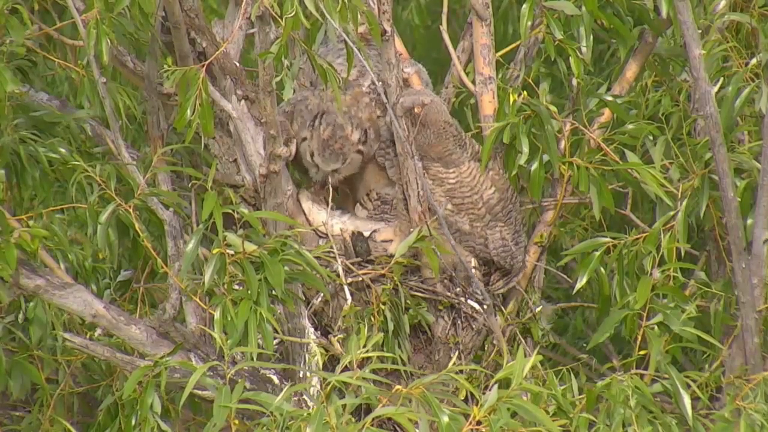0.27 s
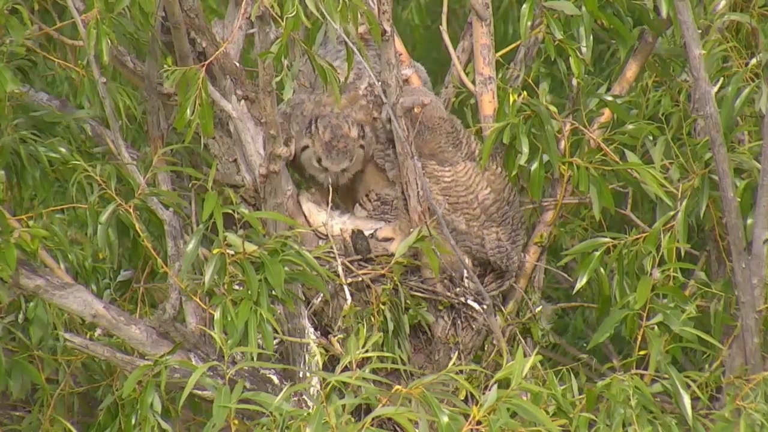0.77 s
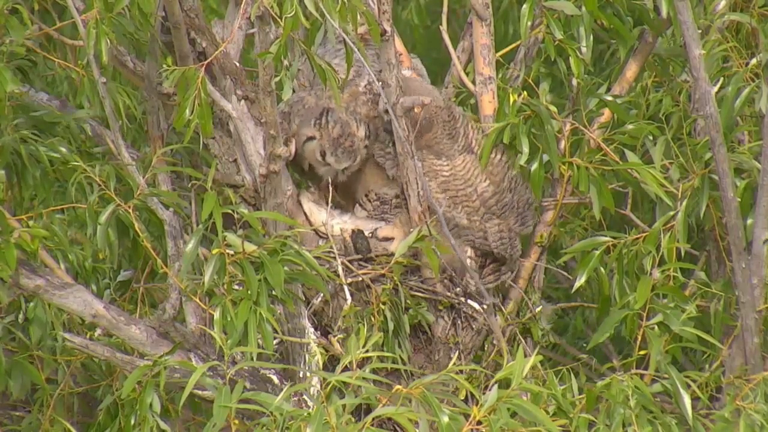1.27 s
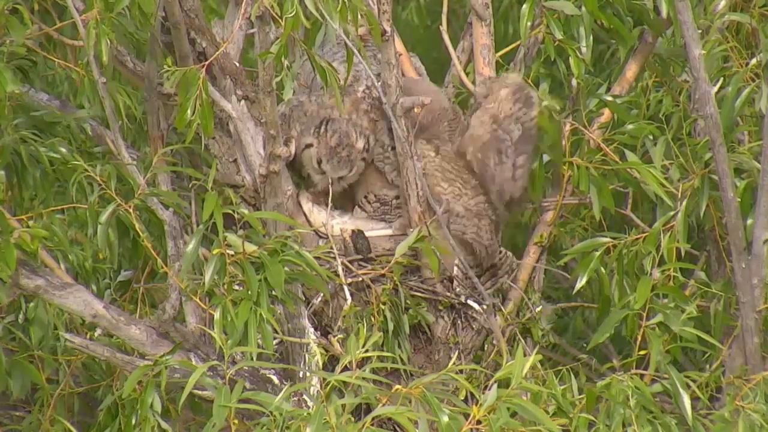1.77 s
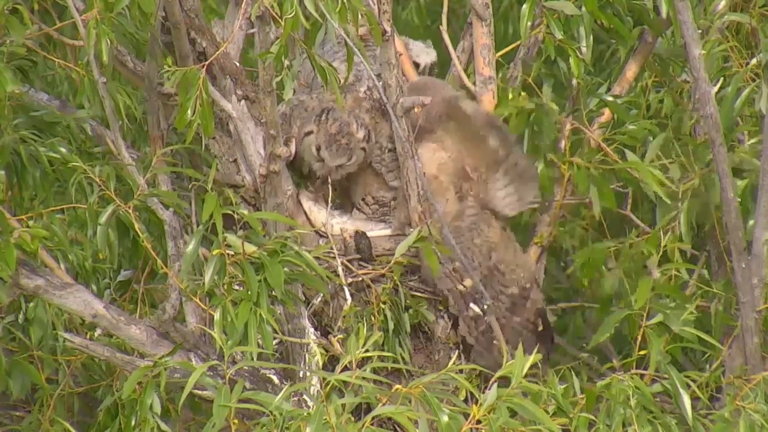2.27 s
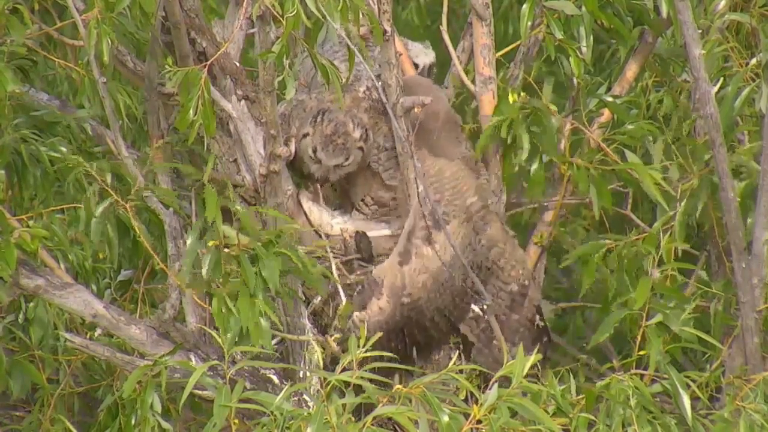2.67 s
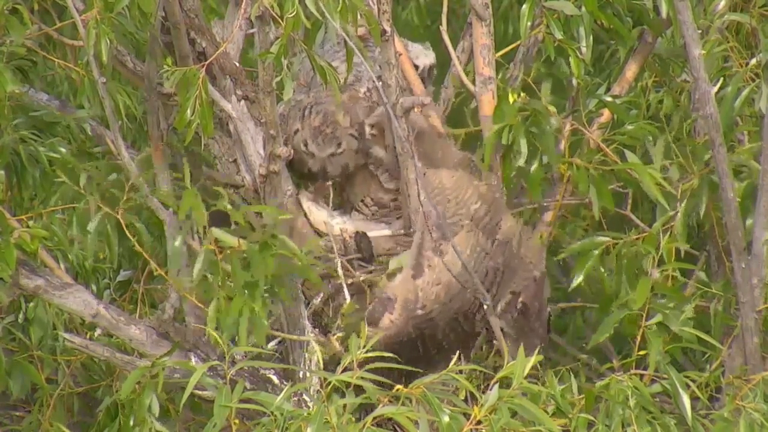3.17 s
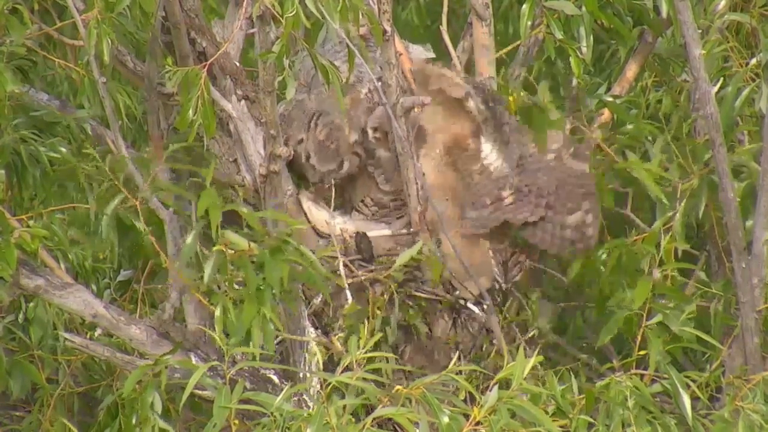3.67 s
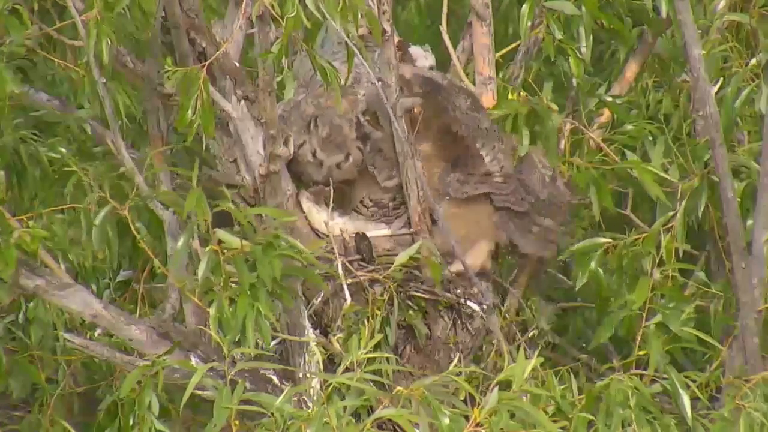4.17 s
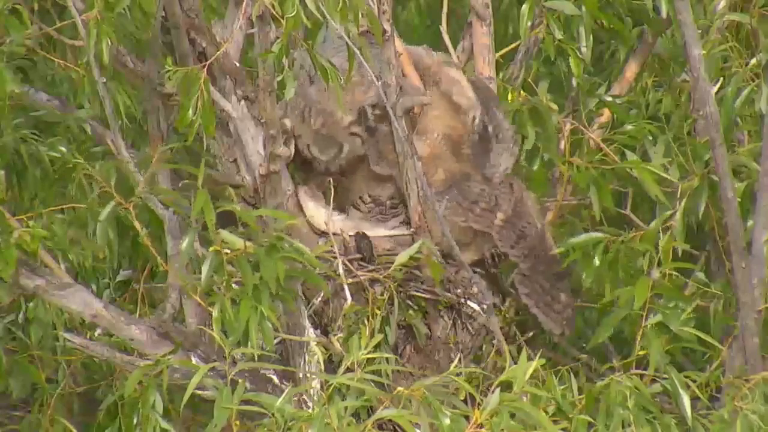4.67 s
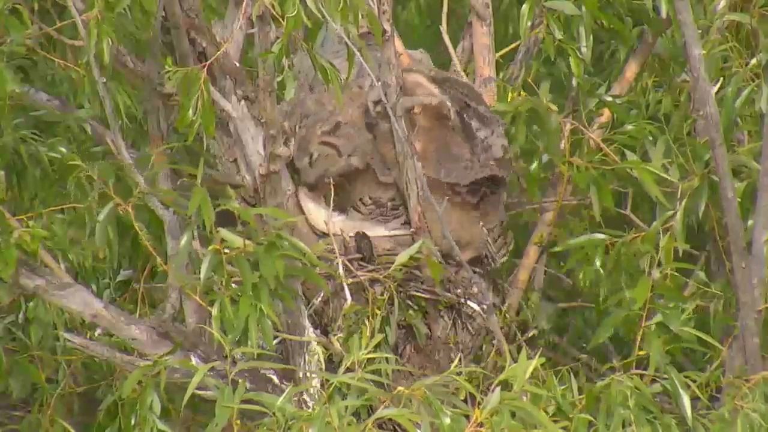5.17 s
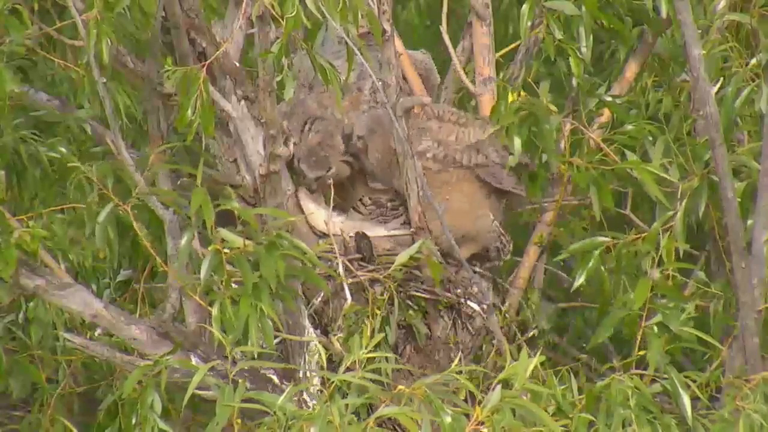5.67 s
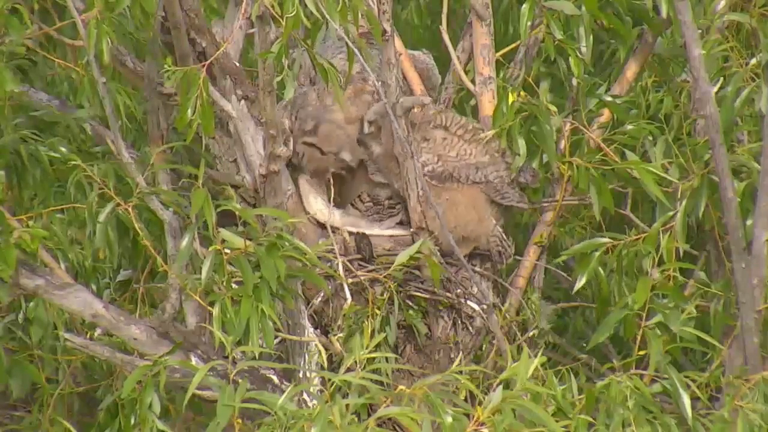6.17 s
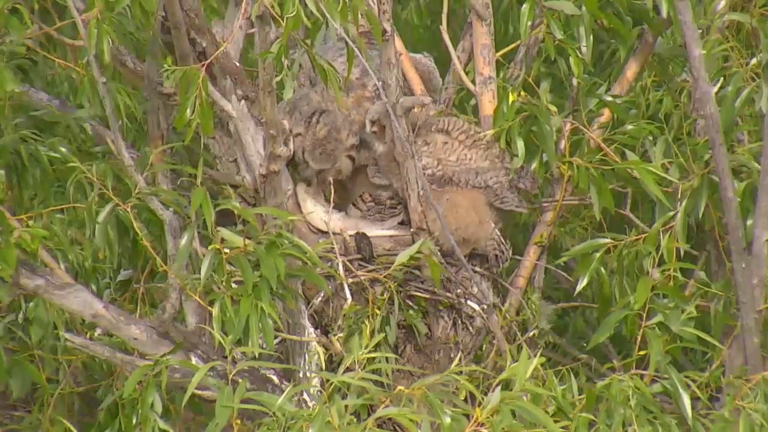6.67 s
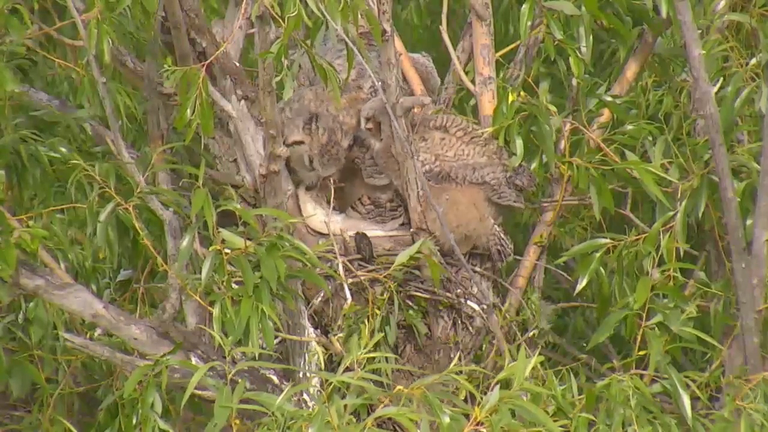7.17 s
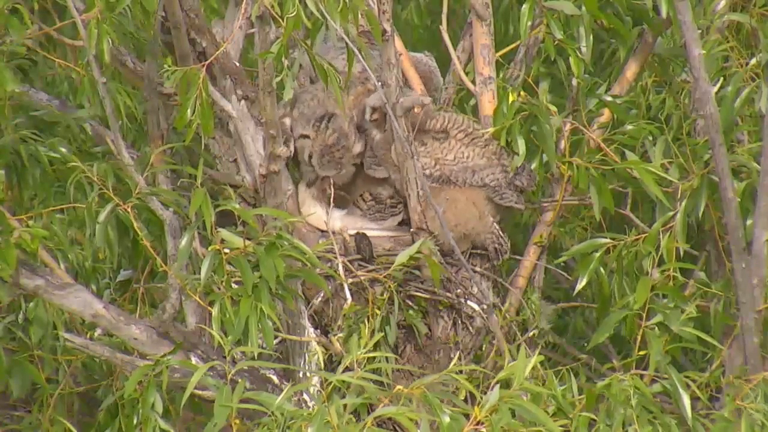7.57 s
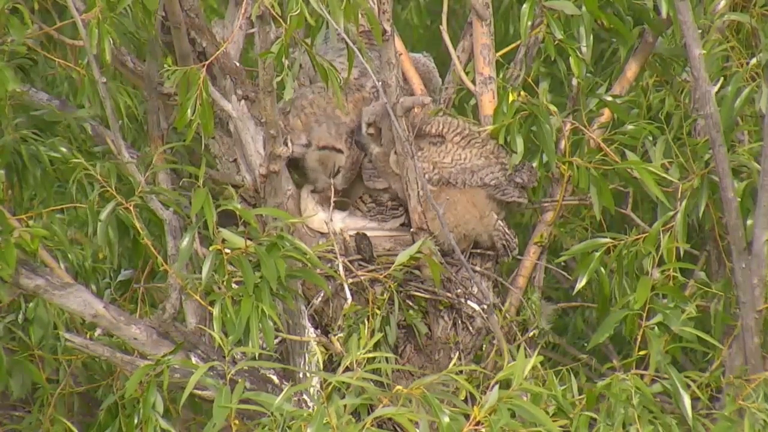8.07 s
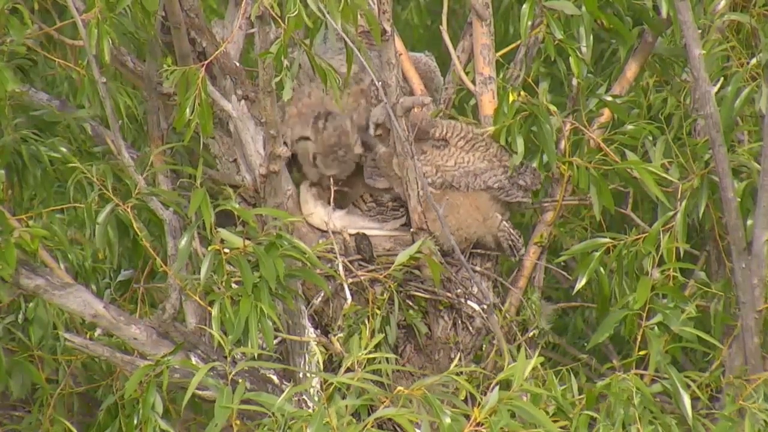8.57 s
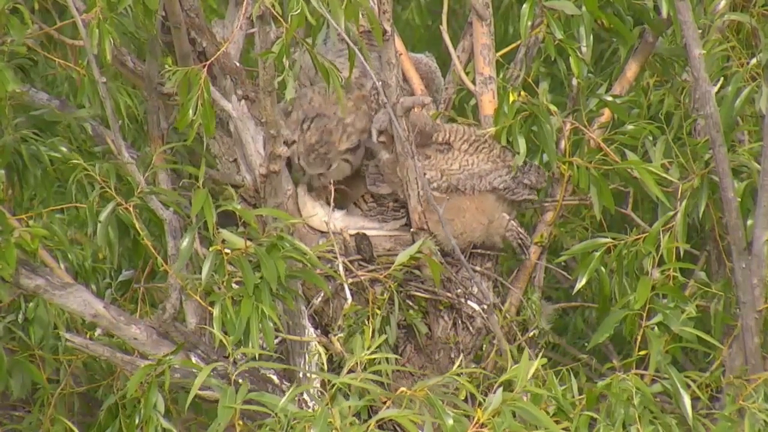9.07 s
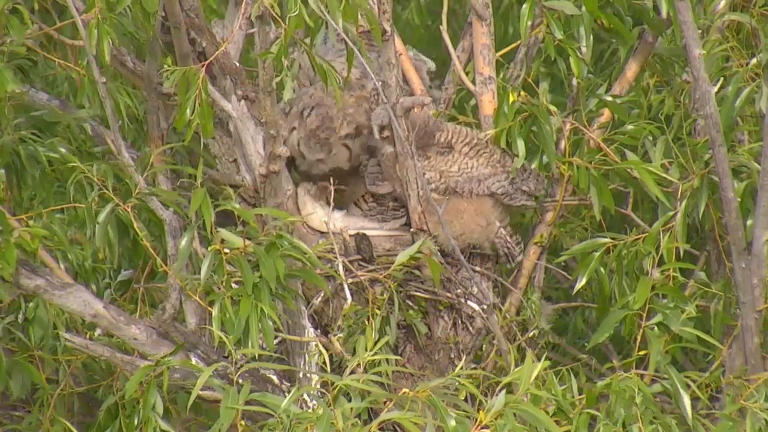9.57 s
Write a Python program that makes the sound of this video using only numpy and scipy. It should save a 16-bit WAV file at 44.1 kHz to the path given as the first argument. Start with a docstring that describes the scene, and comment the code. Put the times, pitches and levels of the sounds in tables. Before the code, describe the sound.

Hissing begging rasps, short hoarse chirps, sharp bill clicks and rising squeals from nestling owls, above a faint steady hum and distant birds.

```python
"""First comes a long hissing rasp, already under way: young owls beg from a nest in a willow.
Noise ringing in a windpipe makes the rasps, rough gliding tones the squeals, short rings the bill snaps.
Other birds rasp, whistle and trill further off, as moving bands of noise and hoarse lines.
A distant flock and gusty air lie behind; the camera adds mains hum, thin whines and a constant offset."""
import sys
import numpy as np
from scipy import signal
from scipy.fft import rfft, irfft
from scipy.io import wavfile
from scipy.ndimage import uniform_filter1d

SR = 44100
rng = np.random.default_rng(int(sys.argv[2]) if len(sys.argv) > 2 else 0)


def materialize(psi):
    """Save the field psi as 16-bit PCM at rate SR to the path in sys.argv[1].

    A 1-D psi becomes a single channel; in a 2-D psi each row is a channel.
    """
    bounded = np.clip(np.atleast_2d(psi).T, -1, 1)
    quanta = np.round(bounded * 32767).astype(np.int16)
    wavfile.write(sys.argv[1], SR, quanta)


N = 432621

# Every call table opens with start t/s, loudest t/s, end t/s, shown below as "..".
# Levels and pitches are starting values that each call's rule then shapes.

# Rasps of the near owlet: .., windpipe f/Hz, onset level/dB, loudest level/dB, closing level/dB,
# first mode level/dB, upper modes level/dB, middle mode level/dB, blur (scales the widths)
NEAR_RASP_CALLS = [(-0.1, 0.1, 0.428, 1218, -50, -44, -52, -15, -11, -8, .65),
                   (5.642, 6.1, 6.2, 1270, -58, -55, -56, -17, -13, 1, 1.1),
                   (8.08, 8.44, 8.645, 1285, -59, -49, -55, -20, -11, -1, 1.2)]
# Noisy windpipe modes: multiple of the windpipe pitch, width at blur 1 f/Hz, level/dB
WINDPIPE_MODES = [(1.999, 250, -18.5), (2.55, 546, 0.5), (3.1, 710, 2), (3.599, 500, -12), (4, 676, 2),
                  (4.7, 800, -17.5), (6, 1500, -23)]
FIRST_MODE_WIDTH_HZ, FIRST_MODE_ROUGH = 110, .6  # halo width and share of noise, both at blur 1
# As the beak shuts, the pitch sags by a share and the outer modes come up
CLOSING_SAG, CLOSING_S, CLOSING_LIFT_DB = .06, .05, 7
VOICE_LAG_S, VOICE_LAG_DB = .14, -14  # the first mode speaks late
UPPER_GROWTH_DB = 3.5  # the upper modes grow by this before the loudest moment, and again after
# Hiss sweeping up as the beak opens, down as it shuts: lasting t/s, from f/Hz, to f/Hz, level/dB beside the rasp
OPENING, SHUTTING = (.035, 3270, 5760, -4), (.085, 5600, 3700, -7)
BEAK_WIDTH_HZ = 450

# Rising voiced cries: .., start f/Hz, loudest f/Hz, end f/Hz, root level/dB, octave level/dB, roughness 0-1
SQUEAL_CALLS = [(5.89, 5.93, 5.96, 1120, 1230, 1220, -72, -51, .45),
                (6.03, 6.13, 6.27, 1290, 1410, 1410, -78, -39.5, .3),
                (6.14, 6.21, 6.38, 1420, 1540, 1700, -78, -38.5, .4),
                (6.278, 6.305, 6.34, 1300, 1430, 1560, -58, -39.5, .1),
                (6.893, 6.98, 7.09, 1170, 1450, 1570, -61, -37.5, .15)]
SQUEAL_ONSET_DB, SQUEAL_RELEASE_DB = 16, 15
# Short cries that arch up in pitch, most of them dropping again: same columns as the squeals
CHIRP_CALLS = [(0.838, 0.858, 0.87, 1180, 1360, 1300, -61, -47, .45),
               (1.403, 1.425, 1.447, 1100, 1480, 1120, -54, -39, .3),
               (4.538, 4.566, 4.585, 1065, 1500, 1210, -49, -40, .3),
               (5.88, 5.91, 5.93, 1220, 1580, 1620, -57, -56, .3),
               (6.33, 6.365, 6.395, 1560, 1986, 1350, -53, -50, .2)]
CHIRP_ONSET_DB, CHIRP_RELEASE_DB = 2, 11
# The throat favours one region for the octave; the root grows with pitch
THROAT_HZ, THROAT_WIDTH_HZ, PITCH_DB_PER_OCTAVE = 2650, 800, 24
HOARSE_WIDTH_HZ, LEAST_ROUGH = 280, .28
STRAND_HZ, STRAND_DEPTH = 210, .3  # beat in the octave; rms depth

# Rough cries that swell into a chirp: .., start f/Hz, end f/Hz, root level/dB, octave level/dB,
# third multiple level/dB
SQUAWK_CALLS = [(0.69, 0.815, 0.84, 1380, 1460, -63, -49, -68),
                (1.31, 1.385, 1.405, 1300, 1400, -58, -44.5, -68),
                (4.475, 4.535, 4.548, 1150, 1380, -53, -45, -58),
                (5.825, 5.88, 5.9, 1020, 1400, -66, -53, -62)]
SQUAWK_ONSET_DB, SQUAWK_RELEASE_DB = 9, 3
FLUTTER_SHARE, FLUTTER_DEPTH = .23, .8  # flutter rate as a share of the pitch; depth inside an exponential
SQUAWK_ROUGH, SQUAWK_HALO_HZ = .7, 380  # the halo widens with each multiple

# Bill snaps: t/s, peak level/dB before echo and filter, pitch f/Hz, low knock level/dB
BILL_SNAPS = [(1.249, -17.5, 3420, -17), (1.694, -38, 2300, -22), (2.76, -51, 3230, -15),
              (3.462, -38, 2380, -17), (3.824, -37, 3150, -26), (4.704, -32, 3310, -2.5),
              (4.914, -18.5, 2480, -4.5), (5.1, -20.5, 2840, -8), (5.573, -46.5, 2790, -27),
              (5.696, -38, 3280, -26), (7.324, -26, 3240, -14), (7.467, -37.5, 3070, -16)]
# Ringing modes of the bill's horn: f/Hz, level/dB, time to fall 60 dB t/s
BILL_MODES = [(2560, -7, 0.015), (3550, -4.5, 0.0089), (4600, -37, .006)]
# Hollow modes of the mouth: f/Hz, level/dB, time to fall 60 dB t/s
KNOCK_MODES = [(820, 0.5, 0.0052), (1220, 0.5, 0.013)]
SNAP_T60_S, SNAP_RISE_S = .008, .0005
SNAP_ECHO_S, SNAP_ECHO_DB = .0021, -14
SNAP_LOW_HZ, SNAP_TOP_HZ = 476, 5100

# Rasps of further birds: .., onset drop level/dB, release drop level/dB, low band f/Hz, middle band f/Hz,
# low band level/dB, middle band level/dB, top band level/dB, blur (scales the widths)
FAR_RASP_CALLS = [(0.76, 0.99, 1.36, 9, 12, 3170, 3690, -51, -50, -60, .67),
                  (2.27, 2.3, 2.32, 6, 6, 3400, 3750, -64, -62, -70, .73),
                  (2.42, 2.66, 2.93, 16, 14, 3200, 3550, -54, -57, -65, .86),
                  (3.3, 3.37, 3.58, 10, 2, 3160, 3800, -62, -54, -76, .6),
                  (3.42, 3.8, 4.12, 16, 16, 3220, 3680, -51, -56, -63, .7),
                  (4.6, 4.8, 5.15, 12, 14, 3100, 3660, -57, -65, -68, .7),
                  (5.72, 5.9, 6.06, 10, 8, 3220, 3600, -52, -66, -76, .5),
                  (6.15, 6.33, 6.5, 16, 14, 2850, 3450, -52, -56, -72, 1.1),
                  (6.94, 7.18, 7.52, 13, 14, 3120, 3600, -51.5, -60, -64, 1),
                  (8.69, 8.85, 8.97, 10, 16, 3290, 3600, -51, -63, -72, .4),
                  (9.08, 9.3, 9.78, 12, 9, 3200, 3650, -53.5, -63, -71, .7)]
FAR_WIDTHS_HZ, FAR_TOP_HZ = (420, 650, 470), 4320  # low, middle and top widths at blur 1
FAR_DARKEN_DB = 6  # the upper bands lead and fade first
FAR_RISE, FAR_PATCHY_DB, FAR_PATCH_HZ = .015, 2, 14  # pitch share, rms flicker, flicker noise width

# Thin bands of hiss above some calls: .., start f/Hz, end f/Hz, level/dB
HISS_CALLS = [(3.33, 3.55, 3.85, 5000, 5080, -72), (4.55, 4.575, 4.586, 3200, 4000, -53),
              (6.2, 6.3, 6.42, 4400, 5150, -66)]
HISS_EDGE_DB = 6
# Single whistled lines: .., start f/Hz, loudest f/Hz, end f/Hz, level/dB, roughness 0-1
WHISTLE_CALLS = [(0.56, 0.6, 0.68, 960, 964, 965, -66, .1), (2.68, 2.735, 2.78, 3440, 3330, 3270, -45, .1),
                 (6.06, 6.1, 6.14, 1920, 2050, 2170, -59, .2),
                 (6.15, 6.21, 6.27, 2130, 2330, 2450, -52, .4),
                 (6.23, 6.315, 6.36, 2350, 2680, 2800, -44, .3),
                 (6.34, 6.39, 6.48, 2550, 2700, 2800, -50, .7),
                 (6.37, 6.41, 6.47, 1900, 1960, 1980, -63, .5),
                 (6.69, 6.72, 6.775, 2140, 2125, 2140, -60, .1),
                 (6.88, 6.92, 6.96, 1690, 1850, 1924, -62, .3),
                 (6.95, 7.0, 7.07, 2520, 2640, 2750, -45, .6),
                 (8.72, 8.84, 8.95, 3290, 3290, 3250, -56, .3)]
WHISTLE_EDGE_DB = 12
# Trills: .., pitch f/Hz, level/dB, beat depth 0-1
TRILL_CALLS = [(1.9, 2.1, 2.28, 4330, -70, .25), (2.81, 2.95, 3.13, 4340, -71, .7),
               (4.95, 5.05, 5.22, 4300, -70, 1), (5.36, 5.5, 5.6, 4100, -72, .2),
               (6.75, 6.82, 6.9, 4130, -77, .3), (7.85, 7.95, 8.06, 4150, -74, .3),
               (8.72, 8.79, 8.93, 4090, -63, .5), (9.68, 9.76, 9.83, 4040, -72, 0)]
TRILL_RATE_HZ, TRILL_WIDTH_HZ, TRILL_EDGE_DB = 27, 150, 4
# A low nasal call far off: .., start f/Hz, loudest f/Hz, end f/Hz, level/dB
QUACK_CALLS = [(4.05, 4.14, 4.28, 212, 228, 221, -75)]
# Throat resonances of the quack: f/Hz, width f/Hz, level/dB
QUACK_RESONANCES = [(1020, 350, 5.5), (2100, 640, 6.5)]
QUACK_EDGE_DB = 14

LEAVES_T60_S, LEAVES_DB = 0.1, -6.5
# Level of the distant flock over time: t/s, level/dB
FLOCK_LEVELS = [(0.0, -60), (0.3, -61), (0.55, -71), (1.26, -65), (1.83, -70), (2.7, -64), (3.3, -68),
                (4.2, -65.5), (5.22, -69), (5.65, -69), (6.1, -62), (6.6, -69), (7.1, -62), (7.6, -73),
                (8.3, -65), (8.75, -65), (9.05, -72), (9.4, -67), (9.81, -69)]
# Bands of the distant flock: f/Hz, width f/Hz, level/dB added to the flock's level
FLOCK_BANDS = [(2650, 580, 2.5), (2973, 310, 3), (3380, 480, -0.5), (4150, 425, -12)]
# Spectrum shape of the air: f/Hz, relative level/dB per Hz
AIR_SPECTRUM = [(15, 1), (30, -5.5), (65, -3), (100, -8), (160, -16.5), (310, -21), (630, -24.5),
                (1300, -27.5), (2200, -27.5), (4500, -34), (6300, -39), (10000, -45), (13000, -49.5),
                (15700, -50.5)]
AIR_DB = -54.5
# The air grows a little louder around one moment
AIR_SWELL_S, AIR_SWELL_WIDTH_S, AIR_SWELL_DB = 5.6, 1.6, 1.2

MAINS_HZ = 59.94
# Mains hum: level/dB of each multiple in turn, from the first
HUM_LEVELS = [-67, -67.5, -71.5, -74.5, -80, -82, -86, -92, -88.5, -88, -85.5]
# Thin steady whines: f/Hz, level/dB
WHINE_LINES = [(1914, -81), (6667, -97), (7681, -97), (7800, -99), (7920, -95), (13333, -98)]
OFFSET, TOP_HZ = .0203, 15700


def undb(db):
    """Turn a level in dB into a gain."""
    return 10 ** (np.asarray(db) / 20)


def wander(count, width_hz):
    """Make slowly turning complex noise of a given bandwidth, with rms 1."""
    settle = 2000  # samples dropped while the filter starts up
    noise = rng.standard_normal((count + settle, 2)) @ [1, 1j]
    lowpass = signal.bessel(3, width_hz / 2, fs=SR, output="sos", norm="mag")
    noise = signal.sosfilt(lowpass, noise)[settle:]
    return noise / np.sqrt(np.mean(abs(noise) ** 2))


def turn(hz):
    """Spin a phasor at a moving frequency; its real part is a tone of rms 1."""
    return np.sqrt(2) * np.exp(2j * np.pi * np.cumsum(hz) / SR)


def band(hz, width_hz):
    """Ring turbulence in one moving resonance: noise carried up to the pitch."""
    return (turn(hz) * wander(len(hz), width_hz)).real


def hoarse(hz, rough, width_hz):
    """Make a tone that gives a share of its power to a noisy halo."""
    rough = np.clip(rough, 0, 1)
    mix = np.sqrt(1 - rough) + np.sqrt(rough) * wander(len(hz), width_hz)
    return (turn(hz) * mix).real


def walk(rate):
    """Drift at random: levels held for 1 / rate seconds, smoothed twice; spread near 1."""
    hold = int(SR / rate)
    steps = np.repeat(rng.standard_normal(N // hold + 1), hold)
    smooth = uniform_filter1d(uniform_filter1d(steps, hold), hold)
    return 1.3 * smooth[:N]


def glide(x, first, middle, last):
    """Draw straight lines through the values at start, loudest and end."""
    return np.interp(x, [-1, 0, 1], [first, middle, last])


def even_glide(since, left, first, last):
    """Draw one straight line from start to end."""
    return first + (last - first) * since / (since + left)


def swell(x, onset_db, release_db):
    """Round the level in dB, dropping away on both sides of the loudest moment."""
    return -x ** 2 * np.where(x < 0, onset_db, release_db)


def play(calls, rule, fade_s=0.002):
    """Sound each row by its rule, with soft ends; x is -1 at the start, 0 at the loudest, 1 at the end."""
    out = np.zeros(N)
    for start, loudest, end, *columns in calls:
        i = np.arange(max(int(start * SR), 0), min(int(end * SR), N))
        since, left = i / SR - start, end - i / SR
        x = np.interp(i / SR, [start, loudest, end], [-1, 0, 1])
        fade = np.clip(np.minimum(since, left) / fade_s, 0, 1)
        out[i] += fade * rule(x, since, left, *columns)
    return out


def near_rasp(hz, db, first_db, upper_db, middle_db, blur):
    """Air forced through the windpipe half voices its first mode and rings the others with noise."""
    first = hoarse(hz, FIRST_MODE_ROUGH * blur ** 2, FIRST_MODE_WIDTH_HZ * blur)
    rasp = undb(first_db) * first
    lifts_db = [0, middle_db, 0, 0, upper_db, upper_db, upper_db]
    for (multiple, width_hz, mode_db), lift_db in zip(WINDPIPE_MODES, lifts_db):
        rasp = rasp + undb(mode_db + lift_db) * band(multiple * hz, width_hz * blur)
    return undb(db) * rasp


def beak_sweep(gone, from_hz, to_hz):
    """The moving beak sweeps a thin band of hiss, which swells and fades as gone runs from 0 to 1."""
    gone = np.clip(gone, 0, 1)
    sweep = band(from_hz + (to_hz - from_hz) * gone ** 1.8, BEAK_WIDTH_HZ)
    return np.sqrt(np.sin(np.pi * gone)) * sweep


def near_call(x, since, left, hz, onset_db, top_db, end_db, first_db, upper_db, middle_db, blur):
    """A rasp sounds between the opening and the shutting of the beak, which bends its pitch and tone."""
    shut = np.exp(-left / CLOSING_S)
    db = glide(x, onset_db, top_db, end_db)
    first_db = first_db + VOICE_LAG_DB * (since < VOICE_LAG_S) + CLOSING_LIFT_DB * shut
    upper_db = upper_db + UPPER_GROWTH_DB * x + CLOSING_LIFT_DB * shut
    out = near_rasp(hz * (1 - CLOSING_SAG * shut), db, first_db, upper_db, middle_db, blur)

    open_s, from_hz, to_hz, beside_db = OPENING
    out += undb(db + beside_db) * beak_sweep(since / open_s, from_hz, to_hz)
    shut_s, from_hz, to_hz, beside_db = SHUTTING
    out += undb(db + beside_db) * beak_sweep(1 - left / shut_s, from_hz, to_hz)
    return out


def squeal(hz, db, octave_db, rough):
    """A voiced cry has a root and a more smeared octave, which a fast beat splits into strands."""
    root = hoarse(hz, rough, HOARSE_WIDTH_HZ)
    beat = 1 + STRAND_DEPTH * turn(np.full(len(hz), STRAND_HZ)).real
    octave = beat * hoarse(2 * hz, np.maximum(rough, LEAST_ROUGH), 1.55 * HOARSE_WIDTH_HZ)
    return undb(db) * root + undb(octave_db) * octave


def cry(onset_db, release_db):
    """Squeals and chirps share a rule: the root grows with pitch, the octave passes through the throat."""
    def rule(x, since, left, first_hz, top_hz, last_hz, db, octave_db, rough):
        hz = glide(x, first_hz, top_hz, last_hz)
        level_db = swell(x, onset_db, release_db)
        throat_db = -10 * ((2 * hz - THROAT_HZ) / THROAT_WIDTH_HZ) ** 2
        root_db = db + level_db + PITCH_DB_PER_OCTAVE * np.log2(hz / top_hz)
        return squeal(hz, root_db, octave_db + level_db + throat_db, rough)
    return rule


def squawk(hz, *levels_db):
    """A second, slower membrane chops the voice into pulses, which sets side lines round each multiple."""
    flutter = np.exp(FLUTTER_DEPTH * turn(FLUTTER_SHARE * hz).real)
    voice = sum(undb(db) * hoarse(k * hz, SQUAWK_ROUGH, k * SQUAWK_HALO_HZ)
                for k, db in enumerate(levels_db, start=1))
    return voice * flutter / np.sqrt(np.mean(flutter ** 2))


def squawk_call(x, since, left, first_hz, last_hz, *levels_db):
    """A squawk glides evenly and swells almost to its end."""
    level_db = swell(x, SQUAWK_ONSET_DB, SQUAWK_RELEASE_DB)
    return squawk(even_glide(since, left, first_hz, last_hz), *(db + level_db for db in levels_db))


def ring(t, hz, db, t60):
    """A struck mode rings as a sine that dies away."""
    return undb(db) * np.sin(2 * np.pi * hz * t) * 1000 ** (-t / max(t60, .002))


def snaps():
    """The bill claps shut: horn modes ring over a hollow knock of the mouth; the trunk returns it at once."""
    t = np.arange(2000) / SR
    out = np.zeros(N + len(t))
    bill = sum(ring(t, *mode) for mode in BILL_MODES)
    knock = sum(ring(t, *mode) for mode in KNOCK_MODES)
    rise = np.minimum(t / SNAP_RISE_S, 1) ** 2  # horn meets horn over a moment, not at once
    for start, db, hz, knock_db in BILL_SNAPS:
        clap = rise * (ring(t, hz, 0, SNAP_T60_S) + bill + undb(knock_db) * knock)
        i = int(start * SR)
        out[i:i + len(t)] -= undb(db) * clap / abs(clap).max()
    out = out + undb(SNAP_ECHO_DB) * np.roll(out, int(SNAP_ECHO_S * SR))
    bandpass = signal.butter(6, [SNAP_LOW_HZ, SNAP_TOP_HZ], "band", fs=SR, output="sos")
    return signal.sosfilt(bandpass, out[:N])


def far_rasp(bands_hz, levels_db, blur):
    """Three noisy bands of a rasp carry through the leaves."""
    return sum(undb(db) * band(hz, width_hz * blur)
               for hz, db, width_hz in zip(bands_hz, levels_db, FAR_WIDTHS_HZ))


def far_call(x, since, left, onset_db, release_db, low_hz, middle_hz, low_db, middle_db, top_db, blur):
    """A patchy swell darkens while its low band creeps up and its middle band creeps down."""
    levels_db = []
    for db in (low_db, middle_db - FAR_DARKEN_DB * x, top_db - FAR_DARKEN_DB * x):
        patches_db = FAR_PATCHY_DB * np.sqrt(2) * wander(len(x), FAR_PATCH_HZ).real
        levels_db.append(db + swell(x, onset_db, release_db) + patches_db)
    bands_hz = low_hz * (1 + FAR_RISE * x), middle_hz * (1 - FAR_RISE * x), np.full(len(x), FAR_TOP_HZ)
    return far_rasp(bands_hz, levels_db, blur)


def hiss_call(x, since, left, first_hz, last_hz, db):
    """One thin band of noise moves on an even glide."""
    hz = even_glide(since, left, first_hz, last_hz)
    return undb(db + swell(x, HISS_EDGE_DB, HISS_EDGE_DB)) * band(hz, BEAK_WIDTH_HZ)


def whistle_call(x, since, left, first_hz, top_hz, last_hz, db, rough):
    """A single line, never quite clean, swells and fades as it glides."""
    line = hoarse(glide(x, first_hz, top_hz, last_hz), np.maximum(rough, LEAST_ROUGH), HOARSE_WIDTH_HZ)
    return undb(db + swell(x, WHISTLE_EDGE_DB, WHISTLE_EDGE_DB)) * line


def trill(x, since, left, hz, db, depth):
    """A narrow band of noise on one pitch beats quickly; a deep beat splits it into repeated notes."""
    beat = (1 + depth * np.sin(2 * np.pi * TRILL_RATE_HZ * since)) ** 2 / (1 + depth)
    level = undb(db + swell(x, TRILL_EDGE_DB, TRILL_EDGE_DB))
    return level * beat * band(np.full(len(x), hz), TRILL_WIDTH_HZ)


def throat(hz):
    """Two resonances set how strongly the quack's throat passes a pitch."""
    return sum(undb(db) / (1 + ((hz - centre_hz) / width_hz) ** 2) ** 2
               for centre_hz, width_hz, db in QUACK_RESONANCES)


def quack_call(x, since, left, first_hz, top_hz, last_hz, db):
    """Harmonics of a low voice, weighted by the throat, arch slightly in pitch and level."""
    hz = glide(x, first_hz, top_hz, last_hz)
    voice = sum(throat(k * hz) * hoarse(k * hz, 0.29, 86) for k in range(3, 13))
    return undb(db + swell(x, QUACK_EDGE_DB, QUACK_EDGE_DB)) * voice


def leaves(x):
    """Branches and leaves scatter a short, dull tail: a dying burst of noise copied onto every sound."""
    t = np.arange(int(.3 * SR)) / SR
    tail = band(np.full(len(t), 2700.), 1600)
    tail = tail * 1000 ** (-t / LEAVES_T60_S) * np.minimum(t / 0.0013, 1)
    tail = .5 * tail / np.sqrt(2 * np.sum(tail ** 2))
    return x + undb(LEAVES_DB) * signal.fftconvolve(x, tail)[:N]


def chorus():
    """Many far birds blur into noise bands that each flicker and drift alone."""
    flock_db = np.interp(np.arange(N) / SR, *np.transpose(FLOCK_LEVELS))
    out = np.zeros(N)
    for hz, width_hz, db in FLOCK_BANDS:
        level = undb(flock_db + db + 1.84 * walk(9))
        out += level * band(hz * (1 + .03 * walk(4)), width_hz)
    return out


def air():
    """Shaped noise makes a low rumble that gusts a little, falling to a smooth hiss."""
    hz, db = np.transpose(AIR_SPECTRUM)
    f = np.fft.rfftfreq(N, 1 / SR)
    shape = undb(np.interp(np.log(f + 1), np.log(hz), db))
    noise = rfft(rng.standard_normal(N)) * shape
    low = 1 / (1 + (f / 110) ** 4)  # share of each frequency that goes to the rumble
    rumble = irfft(noise * low, N) * undb(2.0 * walk(3.9))
    hiss = irfft(noise * (1 - low), N) * undb(.4 * walk(1))
    x = rumble + hiss
    bump = np.exp(-((np.arange(N) / SR - AIR_SWELL_S) / AIR_SWELL_WIDTH_S) ** 2)
    return undb(AIR_DB + AIR_SWELL_DB * bump) * x / x.std()


def scene():
    """The calls and snaps share the scatter of the tree; the flock and the air lie behind."""
    rasps = play(NEAR_RASP_CALLS, near_call, fade_s=0.008)
    rasps += play(FAR_RASP_CALLS, far_call, fade_s=0.02)
    rasps += play(HISS_CALLS, hiss_call, fade_s=.01)
    cries = play(SQUEAL_CALLS, cry(SQUEAL_ONSET_DB, SQUEAL_RELEASE_DB))
    cries += play(CHIRP_CALLS, cry(CHIRP_ONSET_DB, CHIRP_RELEASE_DB))
    cries += play(SQUAWK_CALLS, squawk_call, fade_s=0.014)
    others = play(WHISTLE_CALLS, whistle_call, fade_s=.005)
    others += play(TRILL_CALLS, trill, fade_s=0.015)
    others += play(QUACK_CALLS, quack_call, fade_s=0.025)
    in_tree = leaves(rasps + cries + others + snaps())
    return (in_tree + chorus() + air())[None]


def record(dry):
    """The camera adds mains hum, thin whines and a constant offset, and cuts the top."""
    t = np.arange(N) / SR
    lines = [(k * MAINS_HZ, db) for k, db in enumerate(HUM_LEVELS, start=1)] + list(WHINE_LINES)
    hum = np.zeros(N)
    for hz, db in lines:
        hum += undb(db) * np.sqrt(2) * np.cos(2 * np.pi * (hz * t + rng.random()))
    lowpass = signal.ellip(10, .2, 70, TOP_HZ, fs=SR, output="sos")
    return signal.sosfilt(lowpass, dry + hum) + OFFSET


dry = scene()
out = record(dry)
materialize(out)
```